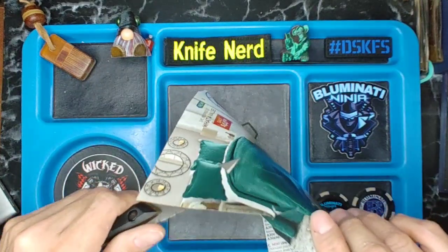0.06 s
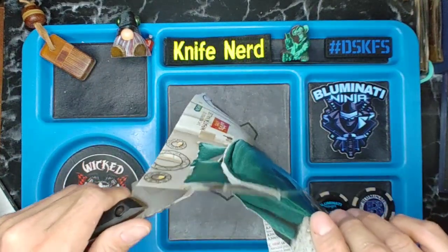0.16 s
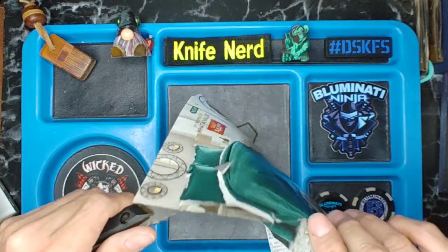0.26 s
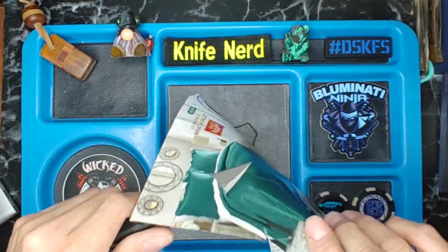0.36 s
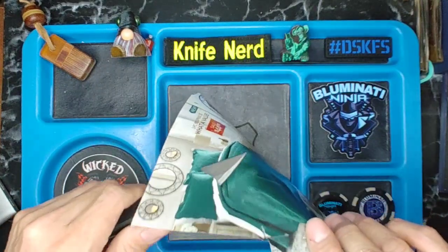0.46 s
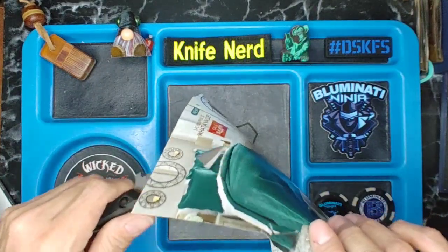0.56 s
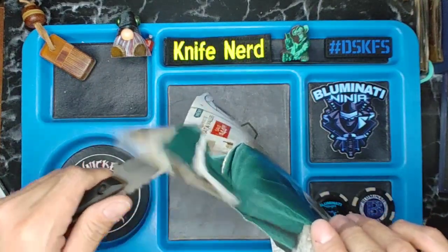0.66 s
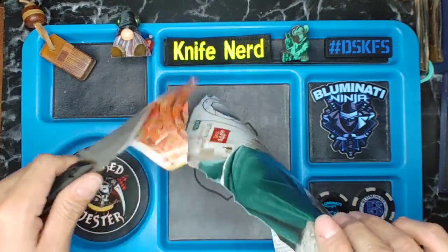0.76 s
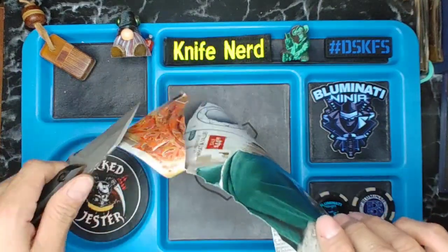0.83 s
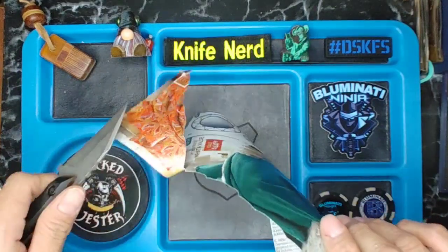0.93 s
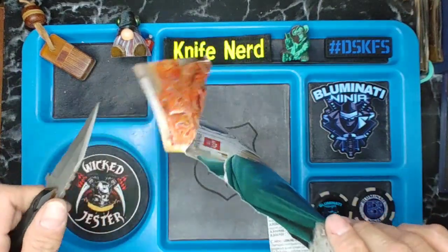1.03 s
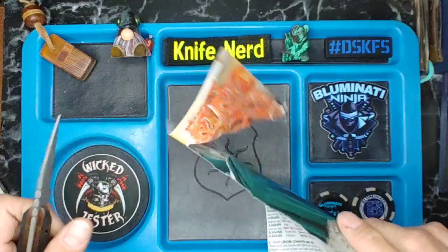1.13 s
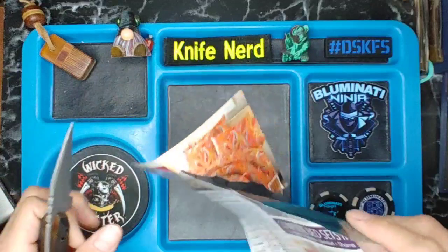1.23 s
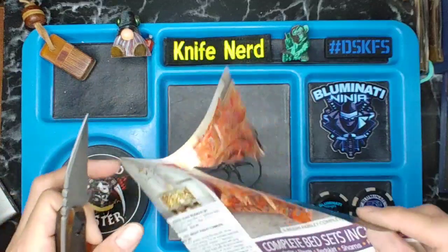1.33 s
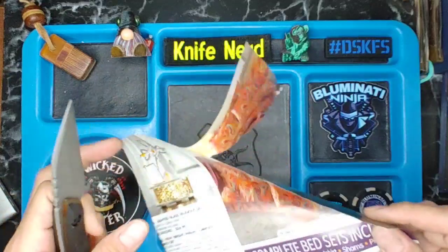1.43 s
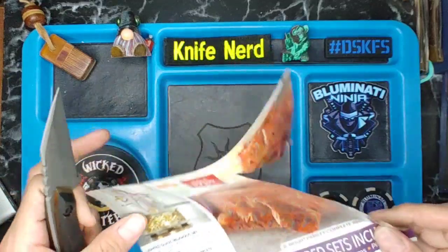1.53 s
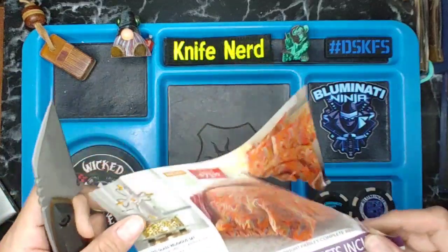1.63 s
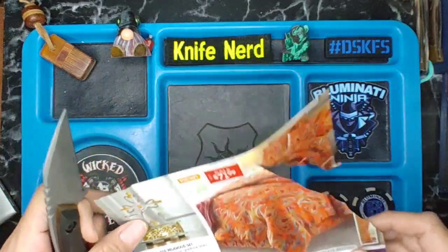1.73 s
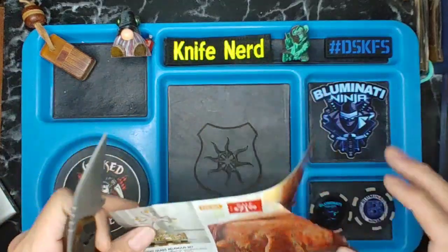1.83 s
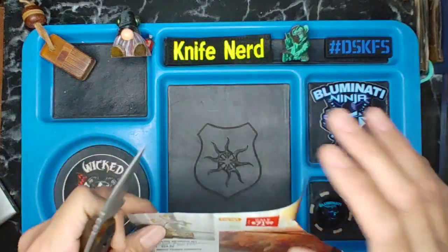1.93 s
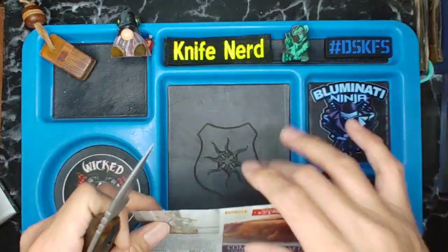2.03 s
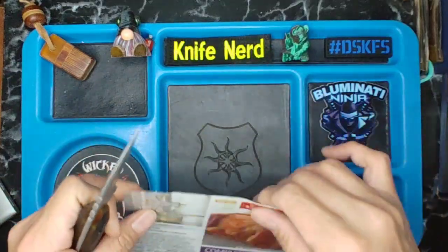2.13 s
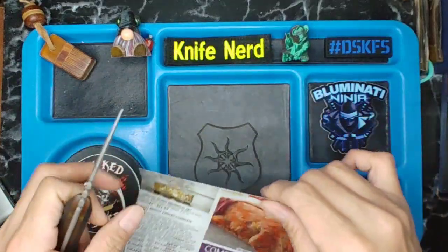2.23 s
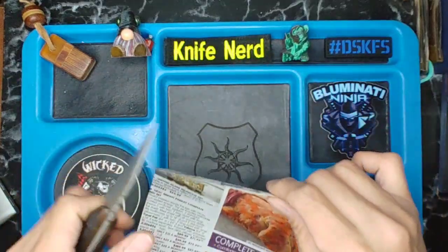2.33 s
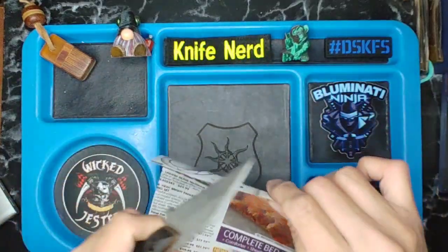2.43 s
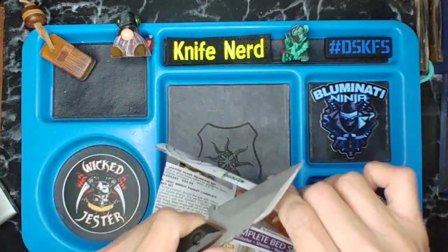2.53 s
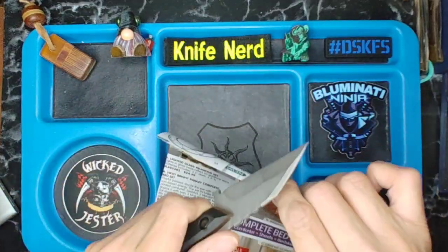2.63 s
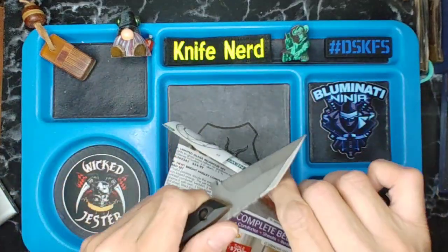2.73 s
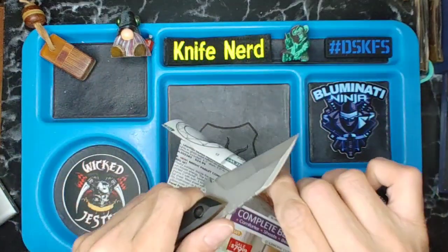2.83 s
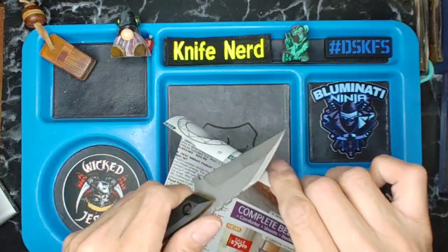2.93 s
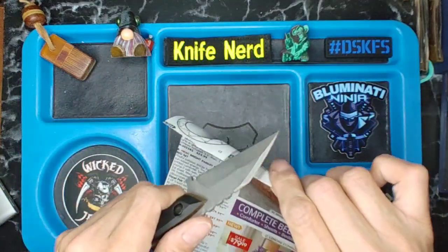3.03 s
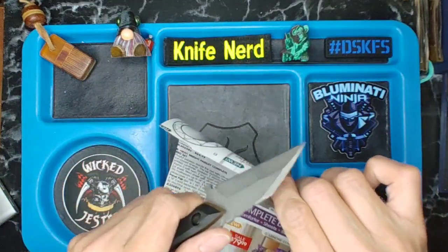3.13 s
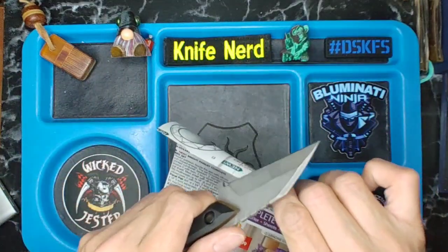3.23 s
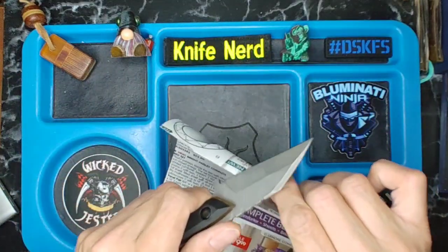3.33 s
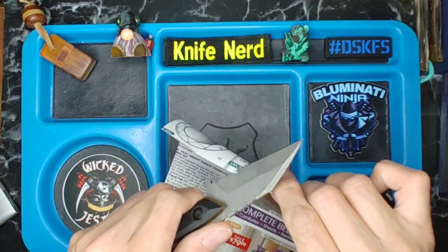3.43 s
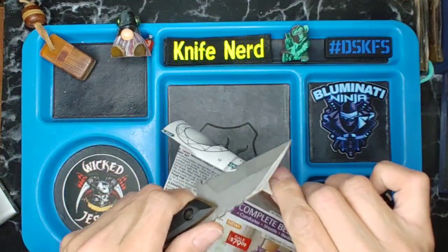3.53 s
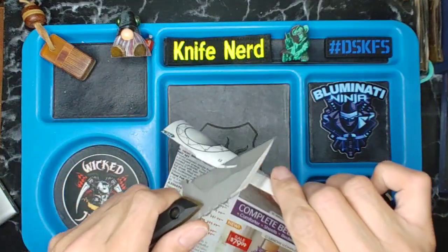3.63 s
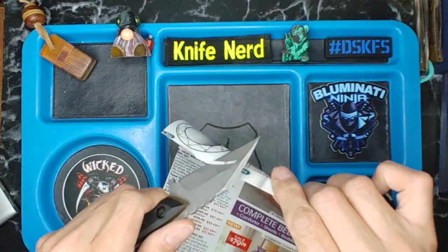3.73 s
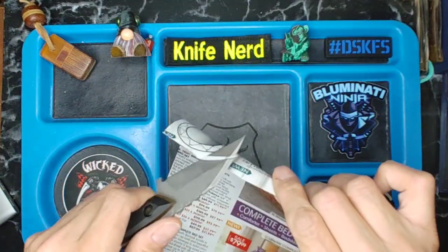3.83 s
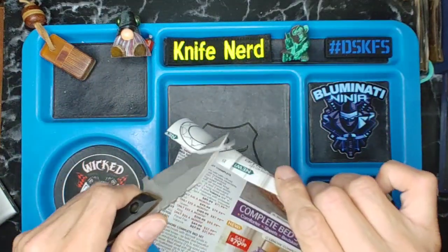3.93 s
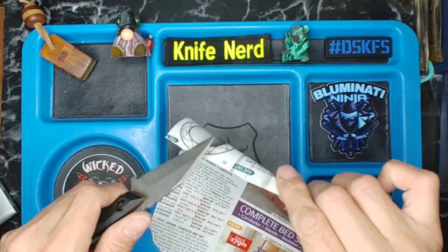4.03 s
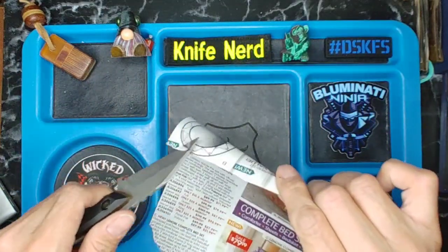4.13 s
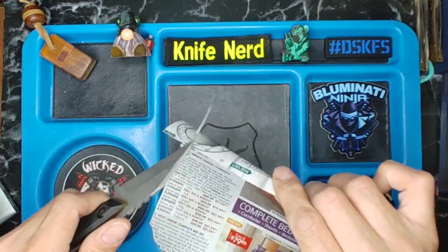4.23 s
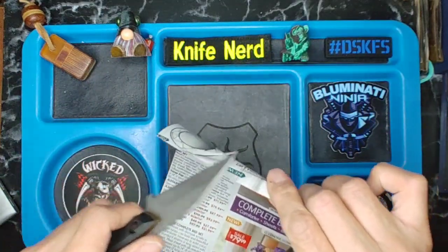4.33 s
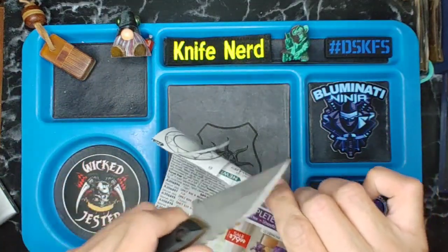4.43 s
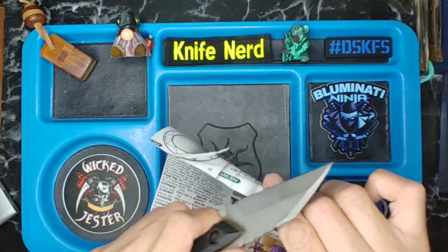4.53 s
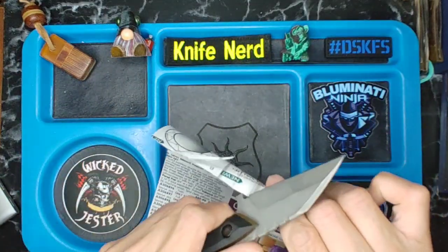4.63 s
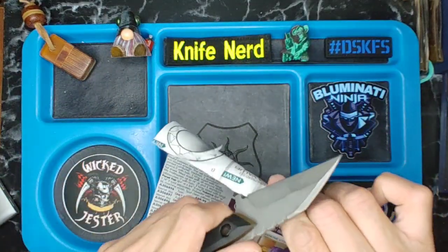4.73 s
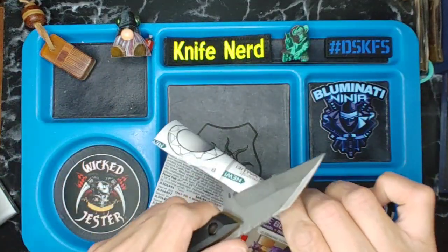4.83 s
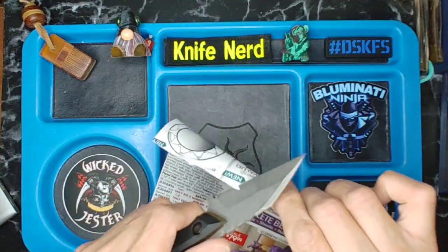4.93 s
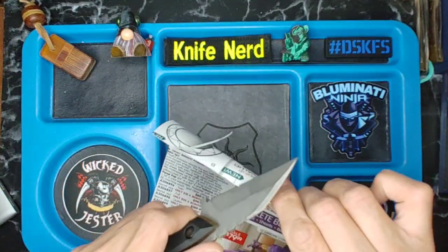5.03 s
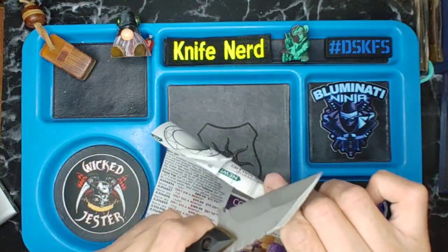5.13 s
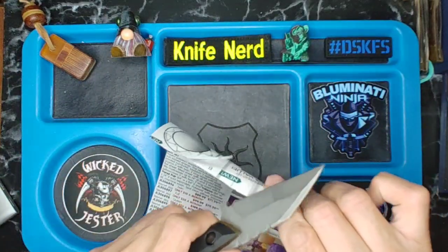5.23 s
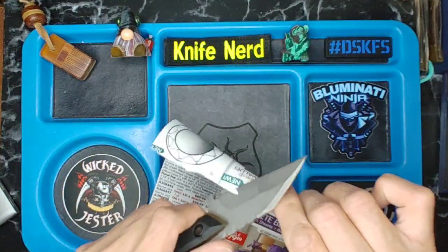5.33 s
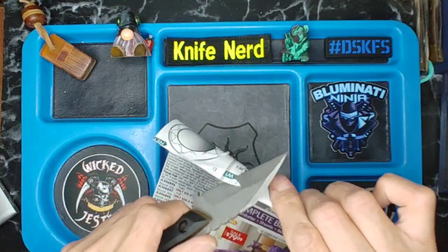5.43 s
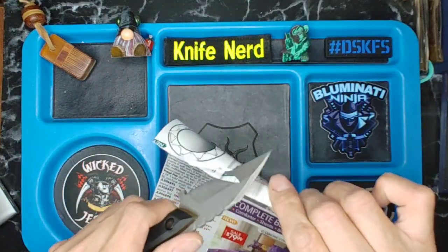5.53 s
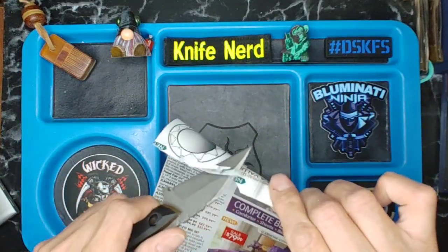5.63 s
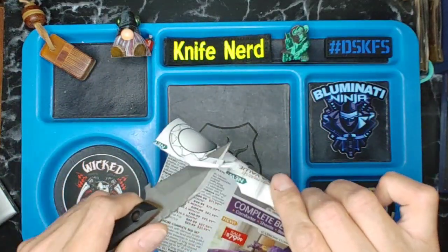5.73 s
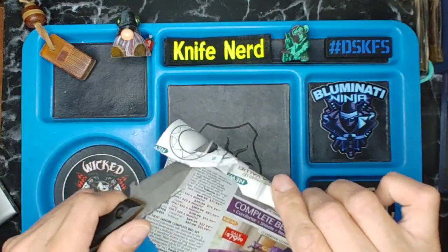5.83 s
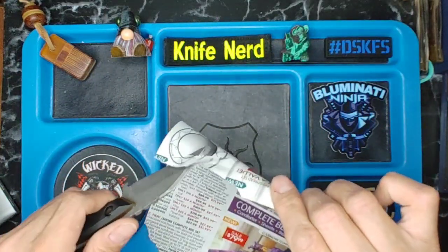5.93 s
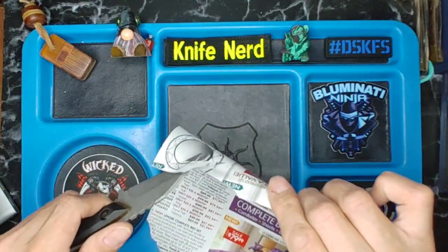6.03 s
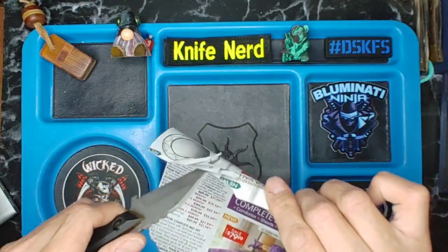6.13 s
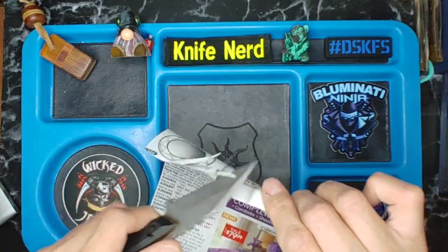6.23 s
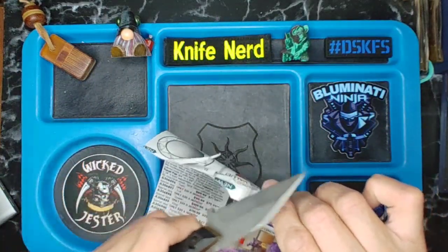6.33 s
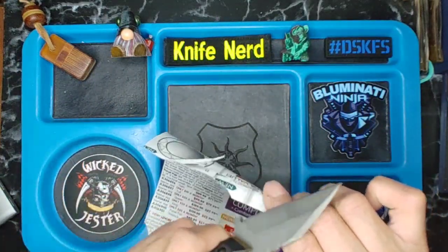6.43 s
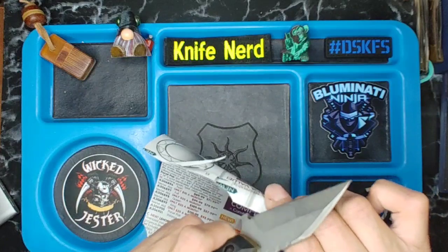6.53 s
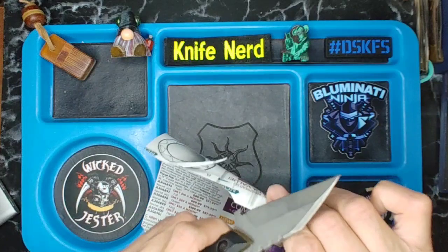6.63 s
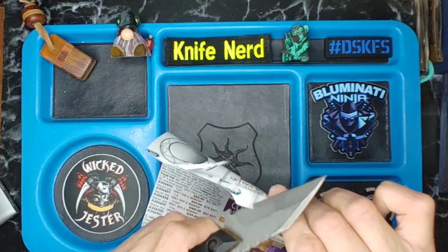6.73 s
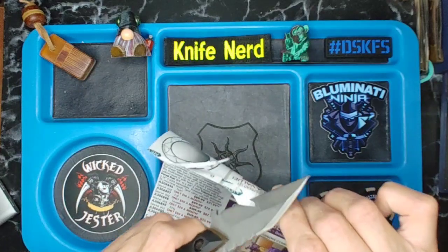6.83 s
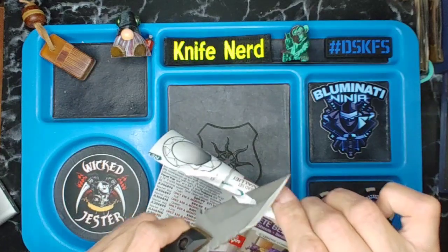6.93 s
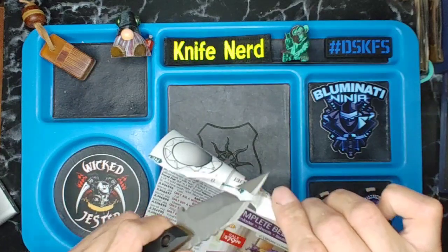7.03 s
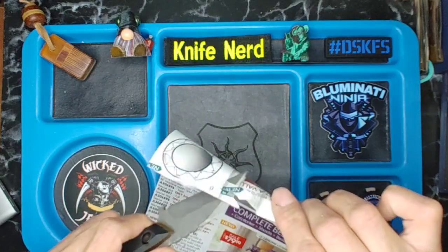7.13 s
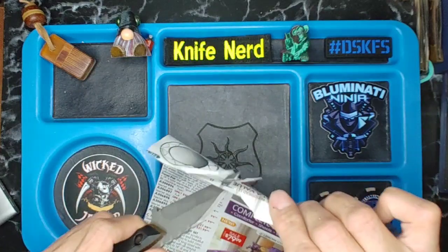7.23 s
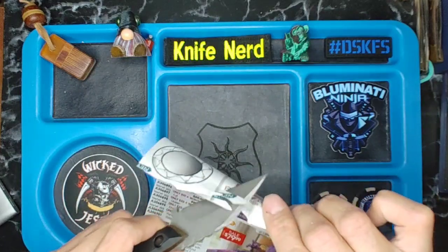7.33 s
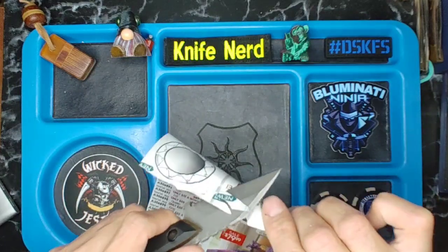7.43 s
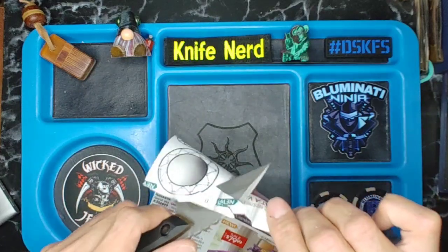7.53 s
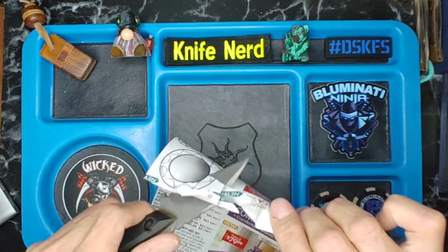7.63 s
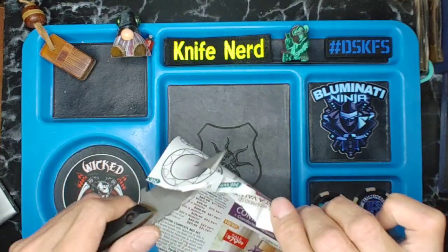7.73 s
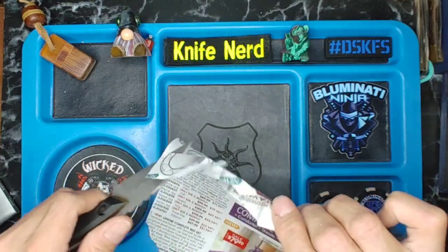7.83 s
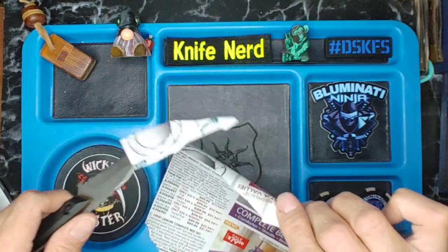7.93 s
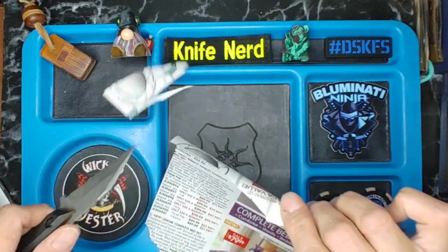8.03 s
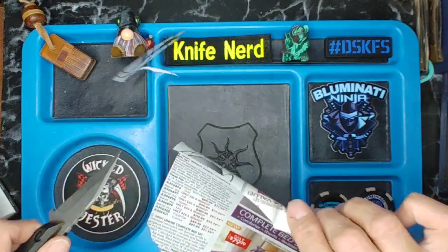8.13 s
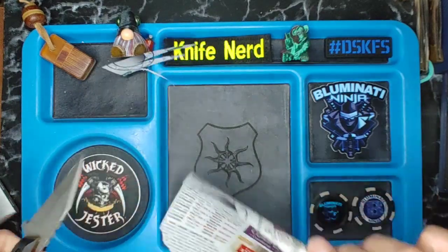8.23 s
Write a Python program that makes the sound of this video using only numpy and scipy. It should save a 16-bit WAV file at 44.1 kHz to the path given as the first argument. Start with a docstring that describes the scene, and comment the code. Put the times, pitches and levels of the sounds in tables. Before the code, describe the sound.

Very close in stereo, a knife makes two long, growing rips through a rolled double sheet of paper. Hands then turn the sheet with sparse rustles and small dry pops. After that, short strokes and longer raspy cuts go through a single sheet, separated by brief pauses with light crackles. A small quiet room hums low with faint hiss, the hum sinking in the pauses.

```python
"""A sharp knife slices thin paper over a plastic tray, close under a stereo microphone.
First come two long cuts through a rolled double sheet, then hands turn the paper: it rustles and creases pop.
From about three seconds on, short strokes and long cuts go through a single sheet, with pops and rustles between.
Cuts and rustles are streams of tiny fibre snaps coloured by the sheet; pops are short bursts of tuned noise.
A quiet room hums and hisses throughout; the recorder turns the hum down in the pauses."""
import sys
import numpy as np
from scipy import signal
from scipy.fft import rfft, irfft, next_fast_len
from scipy.io import wavfile
from scipy.ndimage import uniform_filter1d

SR = 44100
rng = np.random.default_rng(int(sys.argv[2]) if len(sys.argv) > 2 else 0)


def dump(signal):
    """Clip the signal to [-1, 1] and save it as 16-bit WAV at the path in sys.argv[1]."""
    limited = np.clip(np.atleast_2d(signal).T, -1, 1)
    pcm = np.round(limited * 32767).astype(np.int16)
    wavfile.write(sys.argv[1], SR, pcm)


N = 364707  # length of the sound in samples

# long cuts along the single sheet: (rise_s, fall_db_per_s, then over the ring: rasp_db, sizzle_db, low_ring_db;
# left_over_right_db, extra_boom_db), then the course of the cut: (time_s, ring_level_db, extra_treble_db,
# extra_low_ring_db)
LONG_CUTS = [ ((0.0276, 899, 2.5, -6, -4, -0.5, 0), [(3.614, -44.5, 0.56, 3.5), (3.777, -42, -6.5, -6.5),
             (3.843, -38, -1, -5.5), (4.279, -37.5, 1.43, 3.5), (4.298, -41.5, 6, 11),
             (4.31, -50.5, -2.5, 4), (4.345, -52.5, 2, 3.32)]), ((.004, 481.5, 2.5, -7, -8, -1.5, 6.5),
             [(5.092, -41, 2, 6), (5.144, -45.5, 6.5, 6), (5.25, -41, 2.03, -4), (5.31, -60.5, 8, 3.5)]),
             ((0.0729, 259.5, 4, -3.5, -3.5, -0.5, 1.4), [(5.585, -58.5, -0.7, 3), (5.608, -52.5, 4.72, -9),
             (5.618, -40.5, 0.96, 0), (5.726, -41.5, 2, -1.37), (5.9, -35.5, -2.5, -1.5),
             (6.038, -34, -3, 0.92), (6.16, -40, 5.5, 6), (6.18, -52.5, 5, 6)]),
             ((0.0518, 710, 4.5, -1.05, -2, -0.68, -5), [(6.922, -50.5, -3, 3), (6.945, -42, -1.12, 4),
             (6.984, -45.5, -1.5, 0), (7.228, -42.5, 2.5, 0.25), (7.357, -38, 0, 1),
             (7.375, -45, 0, -2.66)]), ((0.08, 254.5, 4.5, -0.5, -3.5, 1, -1.5),
             [(7.737, -53.5, -0.5, -2.5), (7.797, -37, -4, -8.5), (7.903, -36, -1, 0), (7.98, -40, 3, 6),
             (8.095, -32, 0.43, -1.03), (8.145, -41, 5, 5), (8.165, -54.5, 7.5, 4.5)]), ]
# short strokes and touches of the blade: (start_s, rise_s, hold_s, ring_level_db at start of hold and at its end,
# fall_db_per_s, then over the ring: rasp_db, sizzle_db, low_ring_db; left_over_right_db)
SHORT_STROKES = [(3.045, .06, 0.0214, -50.5, -41.5, 154, -2, -16, -2.5, 0.3),
                 (3.196, 0.0122, 0.0567, -58.5, -53, 449.5, 7.5, -10, 6, -1.1),
                 (4.343, 0.0128, 0.02326, -36, -33.5, 226.5, 2, 2, -8.5, 5.53),
                 (4.964, 0.0586, 0.0477, -63, -53.5, 309.5, 8, -4.5, 1.5, -3),
                 (5.523, 0.0114, 0.0348, -46, -42.5, 900, 4.5, -8, -3, -0.2),
                 (7.375, 0.01265, 0.0669, -36, -40, 314, 4.5, 0.5, -2.5, 0),
                 (7.536, 0.0049, 0.1186, -50, -42, 353, 2.5, -1, -16, -1.75)]
# broad colour of the single sheet: (pitch_hz, level_db per Hz)
SHEET_COLOUR = [(240, -55), (400, -13.5), (635, -7.5), (1090, -19), (1370, -10), (1890, -15), (2210, -9.5),
                (2690, -14), (4410, -8.5), (4910, -8), (6890, -9), (8410, -19), (11800, -10), (15800, -21)]
# narrow resonances of the single sheet: (pitch_hz, width_hz, level_db before a shared scale)
SHEET_MODES = [(1385.1, 25.1, 3), (1533.2, 39.2, 4), (1675.5, 40, -2.5), (2123, 76, -2.5), (2345, 72, -0.5),
               (2944, 86, -12.5), (3692.4, 70, 1), (4045, 203, -4), (4422, 52, 7.5), (5256, 82, -6),
               (5446, 117, -2), (6943, 130, -7.5), (6740, 23, -6), (11600, 230, -41)]


def single_sheet_cuts():
    """The blade snaps fibres along one sheet, in long cuts and short strokes, and the sheet rings."""
    cuts = LONG_CUTS + [as_cut(*row) for row in SHORT_STROKES]
    return paper(cuts, SHEET_COLOUR, SHEET_MODES, snaps_per_s=7000, spread_db=2.68, clump_db=0.81,
                 patchy_db=2.34, patch_frames=30, boom_db=-17.5)


# long cuts through the rolled double sheet, same columns as LONG_CUTS
ROLL_CUTS = [ ((.003, 229, -2.5, -7.5, -11.5, 0.1, 3.38), [(0.0, -44.5, 3.5, 0.5), (0.018, -46.5, 10.5, 9),
             (0.084, -36, -2.5, -3), (0.202, -39.5, 2.5, 1.5), (0.443, -27.5, -2.5, -2.5),
             (0.459, -43, 0, -0.42)]), ((0.5, 395, -1, -6.5, -7, 1.71, 0.44), [(0.6, -71, 5, -11),
             (0.7, -62, 7, 2.5), (0.717, -40, -7, -8), (0.919, -28, 2, -1.5), (0.935, -39, 13.5, 7.5),
             (0.987, -45.5, 8, 4.5), (1.03, -60, 8.5, -4), (1.05, -50, 2.35, 0.77)]), ]
# broad colour of the roll: (pitch_hz, level_db per Hz)
ROLL_COLOUR = [(240, -45.5), (400, -7.5), (685, -18), (991, -8.5), (1270, -16.5), (1390, -5.5),
               (1500, -15.5), (2490, -8.5), (3240, -16.5), (3900, -7.5), (8410, -13.5), (14600, -7),
               (15800, -34)]
# narrow resonances of the roll: (pitch_hz, width_hz, level_db before a shared scale)
ROLL_MODES = [(949, 22, -6.5), (1400, 17, -5.5), (1850, 7.6, -6), (2430, 1300, -9.5), (3575, 91, -4),
              (5514, 240, -3.5), (6340, 74, -18), (6990, 130, -7), (7830, 21, -28.5), (11920, 69, -22.5),
              (12100, 79, -17.5)]


def rolled_sheet_cuts():
    """A rolled double sheet is cut the same way, with denser snaps and its own resonances."""
    return paper(ROLL_CUTS, ROLL_COLOUR, ROLL_MODES, snaps_per_s=9000, spread_db=1.5, clump_db=1.4,
                 patchy_db=2.88, patch_frames=41, boom_db=-6.0)


# hands shifting the sheet, same columns as SHORT_STROKES
RUSTLES = [(1.11, 0.0204, 0.102, -77.5, -87, 100, 10.5, 7, 7.5, 0),
           (1.243, 0.0398, 0.0194, -61, -61.5, 262, 11, -9, -0.5, -2.5),
           (1.385, 0.0655, 0.0662, -62.5, -67.5, 300, 14, 0.5, -5.53, -5),
           (1.564, 0.0343, 0.00498, -39.5, -46, 256, 0.83, -26, 4.5, -2.03),
           (1.685, 0.0123, 0.0414, -59.5, -48, 600, 4, -7.5, -3.5, 1.5),
           (1.765, 0.02038, 0.0438, -58.5, -55.5, 308, -5.5, -15, 6.5, 0.3),
           (1.902, 0.0078, 0.0553, -54, -64.5, 221, 2.5, -6, 6.5, 1),
           (2.175, 0.003764, 0.0292, -50, -61, 300, -6.5, -16, -1.5, 1.5),
           (2.215, 0.027, 0.066, -65.5, -69.5, 100, 4.5, -4, -0.5, 2),
           (2.31, 0.0524, 0.0051, -39.5, -41, 194.4, -0.57, -4, -3.5, 5.5),
           (2.49, 0.0227, 0.0666, -66.5, -64, 200, 3, 0, 2.5, 1.5),
           (2.62, 0.0297, 0.1354, -69.5, -68, 200, 4.42, -5, 0, 1.5),
           (2.8, 0.014, 0.124, -72.5, -66, 200, 1.5, -9.5, 0.5, 3),
           (2.748, 0.0038, 0.0137, -53, -52.5, 340, -13, -32.5, -18, 3.5),
           (2.938, 0.00621, 0.00256, -45.5, -59.5, 280, -12.5, -30, -1, -5),
           (4.56, 0.0373, 0.232, -84, -84.5, 210, 0.5, -7.5, -2, 1.72),
           (4.904, 0.0081, .003, -65, -68.5, 450, -4.5, -9.5, 9.5, 3.5),
           (6.322, 0.00225, 0.0667, -59, -61.5, 480, 7.5, -6, -1.5, -3),
           (6.41, 0.0083, 0.075, -77.5, -76.5, 100, 11.5, 0.5, 4, -0.13),
           (6.493, 0.0031, 0.056, -67, -87, 100, 6, 6.27, 5.5, 2),
           (6.6, .008, 0.00262, -66.5, -84.5, 160, 2, -6.5, 3.5, -6),
           (6.645, 0.013, 0.0114, -75.5, -80.5, 350, -2.4, -8, -1, 0.44),
           (8.22, 0.0184, 0.017, -66, -72, 200, 10.5, 3, -4.5, 2.74)]


def rustles():
    """Hands bend the sheet: sparser, more uneven snaps in its broad colour, without narrow resonances."""
    cuts = [as_cut(*row) for row in RUSTLES]
    return paper(cuts, SHEET_COLOUR, [], snaps_per_s=5400, spread_db=3.3, clump_db=1.06,
                 patchy_db=4.72, patch_frames=8, boom_db=-10.5)


# creases that pop: (start_s, level_db before a shared cut of 8.5 dB, pitch_hz, t60_s of the longer fade,
# left_over_right_db, fade_db an octave of the wide crack above the pitch)
POPS = [(0.917, -29.5, 2858, 0.045, -2, -2), (0.97, -24.5, 2010, 0.064, 1.5, 0.5),
        (1.6047, -34, 1560, 0.03634, 1, 8.5), (1.9096, -29, 1850, 0.033, 3.0, 11),
        (2.356, -25, 2260, 0.0474, 12.5, 13.5), (2.3985, -34.5, 2290, 0.058, 7, 4.5),
        (2.4718, -37, 2260, 0.076, 2, 4), (2.6796, -43, 3900, 0.079, 3, 3),
        (2.7453, -24.5, 2615, 0.052, -2, 13), (2.944, -39, 1500, 0.093, 6.5, 8.5),
        (3.8112, -24.5, 2240, 0.064, -9.5, -0.5), (4.2908, -16.5, 3570, 0.067, -2, -3),
        (4.4701, -33.5, 1831, 0.122, 3.5, 5), (4.7356, -56, 2600, 0.048, 3.5, 1.5),
        (4.9112, -42.5, 1470, 0.041, 2, 10), (5.0922, -28.5, 1600, 0.032, 5.5, 4.5),
        (6.328, -38, 1340, 0.0443, 5.5, -0.5), (6.4944, -45.5, 7020, 0.075, 2.5, 8.5),
        (6.564, -48.5, 1350, 0.0512, 3, 4), (6.6004, -50, 6838, 0.0406, -16, 11),
        (7.3534, -20, 2320, 0.053, -4, 2)]


def pops():
    """A crease flips: a tick, then noise in the sheet's colour, strongest round one pitch, dying fast."""
    out = np.zeros((2, N + 8000))
    t = np.arange(4000) / SR
    for start, level_db, pitch_hz, t60, pan_db, fade_db in POPS:
        def pop_colour(hz):
            octaves_above = np.maximum(np.log2((hz + 1) / pitch_hz), 0)
            octaves_below = np.maximum(np.log2(pitch_hz / (hz + 1)), 0)
            crack = .5 * amp(-fade_db * octaves_above - 25.0 * octaves_below)
            ring = 1 / (1 + ((hz - pitch_hz) / 450) ** 2)
            return amp(read(SHEET_COLOUR, hz)) * (crack + ring)

        burst = evened(shaped(rng.standard_normal(len(t)), pop_colour))
        ringing = amp(-60 * t / max(t60, .01))
        tick = 0.54 * amp(-60 * t / 0.0073)
        onset = np.minimum(t / 0.00054, 1)
        sides = amp(level_db - 8.5 + np.array([[pan_db / 2], [-pan_db / 2]]))
        out[:, round(start * SR):][:, :len(t)] += sides * burst * (ringing + tick) * onset
    return out[:, :N]


# limits of the five parts of the paper sound, each part between two neighbours: boom, low ring, ring, rasp,
# sizzle: (edge_hz)
PART_EDGES = [450, 1100, 1900, 3000, 7800, 16500]
BOOM_GROWTH, FIRM_DB = 0.21, -41  # the boom grows this many dB for each dB of ring above a firm stroke
RASP_SHARE = 0.86  # how far the rasp follows the extra treble


def paper(cuts, broad, modes, snaps_per_s, spread_db, clump_db, patchy_db, patch_frames, boom_db):
    """The stream of snaps drives five parts of the sheet's sound, each as strongly as blade or hands make it."""
    times = [row[0] for _, points in cuts for row in points]
    first = max(round((min(times) - .1) * SR), 0)
    last = min(round((max(times) + .4) * SR), N)
    t = np.arange(first, last) / SR
    power = np.zeros((5, 2, last - first))  # part, side, time
    for (rise, fall, rasp_db, sizzle_db, low_db, pan_db, deep_db), points in cuts:
        span = slice(*np.searchsorted(t, [points[0][0] - .1, points[-1][0] + .4]))
        ring_db, treble_db, more_low_db = course(t[span], points, rise, fall)
        low_ring_db = low_db + more_low_db
        growth_db = BOOM_GROWTH * np.maximum(ring_db - FIRM_DB, 0)
        over_ring_db = np.array([low_ring_db + boom_db + deep_db + growth_db,
                                 low_ring_db,
                                 0 * low_ring_db,
                                 rasp_db + RASP_SHARE * treble_db,
                                 sizzle_db + treble_db])
        # doubled dB make power, so each side gets half of the left-right difference
        power[..., span] += amp(2 * (ring_db + over_ring_db[:, None]) + np.array([[pan_db], [-pan_db]]))
    snaps = bending(snaps_at_ports(len(t), snaps_per_s, spread_db, clump_db), patchy_db, patch_frames)
    out = np.zeros((2, N))
    for k, level in enumerate(uniform_filter1d(np.sqrt(power), size=90)):
        def part_colour(hz):
            return colour(hz, broad, modes) * band(hz, PART_EDGES[k], PART_EDGES[k + 1])

        out[:, first:last] += evened(shaped(snaps, part_colour)) * level
    return out


def fibres(count, snaps_per_s, spread_db, clump_db):
    """Snaps of uneven size, arriving in clumps a few milliseconds long."""
    size = amp(spread_db * np.minimum(rng.exponential(1, count), 4)) * rng.choice([-1., 1.], count)
    clumps = evened(uniform_filter1d(uniform_filter1d(rng.standard_normal(count), 150), 150))
    snapping = rng.random(count) < snaps_per_s / SR
    return evened(size * snapping * amp(clump_db * clumps))


def snaps_at_ports(count, snaps_per_s, spread_db, clump_db):
    """Short waves leave different parts of the sheet towards each port, so treble differs more than bass."""
    shared, *apart = (fibres(count, snaps_per_s, spread_db, clump_db) for _ in range(3))

    def own(hz):
        return np.clip(.2 + .055e-3 * hz, 0, 1)

    common = shaped(shared, lambda hz: np.sqrt(1 - own(hz)))
    return common + shaped(np.array(apart), lambda hz: np.sqrt(own(hz)))


def bending(x, patchy_db, patch_frames):
    """As the sheet bends its colour wanders in patches."""
    _, _, z = signal.stft(x, SR, nperseg=512, noverlap=384)
    patches = uniform_filter1d(rng.standard_normal(z.shape[1:]), 4, 0)  # over pitch
    patches = evened(uniform_filter1d(patches, patch_frames, 1))  # over time
    z = z * evened(amp(patchy_db * patches))
    return signal.istft(z, SR, nperseg=512, noverlap=384)[1][:, :x.shape[1]]


def colour(hz, broad, modes):
    """Broad colour of a sheet with its narrow modes standing out."""
    peaks = sum(amp(db - read(broad, f)) / (1 + (2 * (hz - f) / width) ** 2) for f, width, db in modes)
    return amp(read(broad, hz)) * (1 + 0.427 * peaks)


def as_cut(start, rise, hold, first_db, last_db, *rest):
    """A short stroke is a cut whose level runs straight from start to end."""
    top = start + rise
    return (rise, *rest, 0), [(top, first_db, 0, 0), (top + max(hold, 0), last_db, 0, 0)]


RISE_DB = 33  # a stroke or rustle swells in by this many dB for each tenfold of time since its start
TAIL_DB, TAIL_DB_PER_S = -6.5, 268  # after a sudden stop the sheet shivers on, this far down and fading
DULLING_DB_PER_S = 26.5  # the treble dies faster once the sheet is let go


def course(t, points, rise, fall_db_per_s):
    """Ring level, extra treble and extra low ring: quick rise, the given course, a fall into a slower shiver."""
    s, level_db, treble_db, low_db = np.transpose(points)
    before = np.maximum(s[0] - t, 0) / max(rise, 1e-3)
    after = np.maximum(t - s[-1], 0)
    swell_db = RISE_DB * np.log10(np.maximum(1 - before, 1e-4))
    fall_db = np.maximum(-fall_db_per_s * after, TAIL_DB - TAIL_DB_PER_S * after)
    ring_db = np.interp(t, s, level_db) + swell_db + fall_db
    return ring_db, np.interp(t, s, treble_db) - DULLING_DB_PER_S * after, np.interp(t, s, low_db)


def tray(x, wet_db, t60):
    """Dense close reflections off tray, table and walls, other ones at each microphone port."""
    t = np.arange(SR // 5) / SR
    taps = rng.standard_normal((2, len(t))) * amp(-60 * t / t60) * (t > .001)
    tail = signal.fftconvolve(x, taps / np.linalg.norm(taps[0]), axes=1)[:, :N]
    return (x + amp(wet_db) * tail) / np.sqrt(1 + amp(2 * wet_db))


# balance of the two microphone ports: (pitch_hz, left_over_right_db)
PORT_BALANCE = [(60, 4), (110, -7.5), (200, 0), (380, 1), (700, 4), (1290, 2.5), (2380, 2.0), (4400, -3),
                (8120, -6.5), (15000, -4)]


def at_ports(near):
    """The right port hears the treble louder and all of the near sound 36 microseconds later."""
    def ports(hz):
        half_db = read(PORT_BALANCE, hz) / 2
        return amp([half_db, -half_db]) * np.exp(-2j * np.pi * hz * np.array([[0], [3.6e-5]]))

    return shaped(near, ports)


# broad colour of the room: (pitch_hz, level_db per Hz)
HUM_COLOUR = [(18, -63.5), (30, -28), (93, -10), (353, -6), (775, -15), (883, -14), (1030, -27),
              (1660, -20.5), (8420, -36.5), (15800, -27)]
# humps in the hum: (pitch_hz, width_hz, level_db above the hum)
HUM_MODES = [(176.16, 8.2, 9), (272.2, 14, 8.5), (350.45, 50, 9), (887, 65, 9)]
# how alike the hum is on both sides: (pitch_hz, likeness from 0 to 1)
HUM_LIKENESS = [(40, .6), (120, .7), (400, .65), (2400, .3), (15000, .1)]
# the hum drifts: (time_s, level_db)
HUM_LEVEL = [(0.0, -61.5), (1.2, -64), (1.6, -60), (2.1, -64), (3.2, -62), (3.8, -63.5), (5.0, -62),
             (6.2, -64), (7.0, -65.5), (8.27, -64)]
HISS_DB = -79


def room():
    """Low hum that wavers in patches and drifts, with a faint hiss at a steady level above it."""
    frames, hz = N // 256 + 5, np.fft.rfftfreq(1024, 1 / SR)
    a, b, c, d, patches = rng.standard_normal((frames, 513, 5)).T
    patches = evened(uniform_filter1d(uniform_filter1d(patches, 10, 1), 3, 0))
    same = np.clip(read(HUM_LIKENESS, hz), -1, 1)[:, None]
    left = a + 1j * b
    right = same * left + np.sqrt(1 - same ** 2) * (c + 1j * d)
    z = np.array([left, right]) * amp(3.4 * patches)
    noise = signal.istft(z, nperseg=1024, noverlap=768)[1][:, :N]

    def room_colour(f):
        humps_db = sum(db / (1 + (2 * (f - f0) / width) ** 2) for f0, width, db in HUM_MODES)
        return amp(humps_db) * amp(read(HUM_COLOUR, f))

    hum = evened(shaped(noise, lambda f: room_colour(f) * band(f, 12, PART_EDGES[1])))
    hiss = evened(shaped(noise, lambda f: room_colour(f) * band(f, PART_EDGES[1], PART_EDGES[-1])))
    s, level_db = np.transpose(HUM_LEVEL)
    return hum * amp(np.interp(np.arange(N) / SR, s, level_db)) + hiss * amp(HISS_DB)


def amp(db):
    """Turns decibels into a factor."""
    return 10 ** (np.asarray(db) / 20)


def evened(x):
    """Scales a signal to an average strength (rms) of one."""
    return x / np.sqrt(np.mean(x ** 2) + 1e-20)


def read(points, hz):
    """Reads a (pitch_hz, value) table between its points, along a logarithmic pitch axis."""
    f, value = np.transpose(points)
    return np.interp(np.log(hz + 1), np.log(f + 1), value)


def shaped(x, gain):
    """Filters the last axis by a gain given as a function of frequency."""
    size = next_fast_len(x.shape[-1] + 4096)
    return irfft(rfft(x, size) * gain(np.fft.rfftfreq(size, 1 / SR)), size)[..., :x.shape[-1]]


def band(hz, lo_hz, hi_hz):
    """Smooth pass band; neighbouring bands add up in power."""
    return np.sqrt(1 / (1 + (hz / hi_hz) ** 16) / (1 + (lo_hz / (hz + 1)) ** 16))


def scene():
    """All paper sounds reflect off the tray and reach the two ports; the room lies underneath."""
    knife_and_hands = single_sheet_cuts() + rolled_sheet_cuts() + rustles() + pops()
    near = tray(knife_and_hands, wet_db=-9, t60=.08)
    return at_ports(near) + room()


# suppressor: level where it is fully shut, range over which it opens, depth of the cut, closing speed
QUIET_DB, OPEN_DB, CUT_DB, CLOSE_DB_PER_S = -76, 13.5, 11.5, 197
TOP_HZ = 15650  # band limit


def record(dry):
    """A noise suppressor gradually lowers the bass when little is heard above it; then the band limit."""
    low = shaped(dry, lambda hz: band(hz, 1, PART_EDGES[1]) ** 2)
    heard_power = abs(uniform_filter1d(((dry - low) ** 2).mean(0), size=800))
    heard_db = 10 * np.log10(heard_power + 1e-12)
    # held level: jumps up at once, sinks no faster than the closing speed
    fall = np.arange(N) * CLOSE_DB_PER_S / SR
    held_db = np.maximum.accumulate(np.minimum(heard_db, QUIET_DB + OPEN_DB) + fall) - fall
    shut = uniform_filter1d(np.clip(1 - (held_db - QUIET_DB) / OPEN_DB, 0, 1), size=600)
    kept = dry + low * (amp(-CUT_DB * shut) - 1)
    top_limit = signal.firwin(511, TOP_HZ, window=("kaiser", 9), fs=SR)
    return signal.oaconvolve(kept, top_limit[None], "same")


dry = scene()
out = record(dry)
dump(out)
```